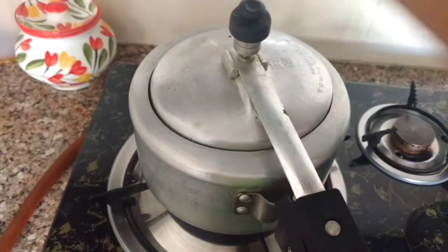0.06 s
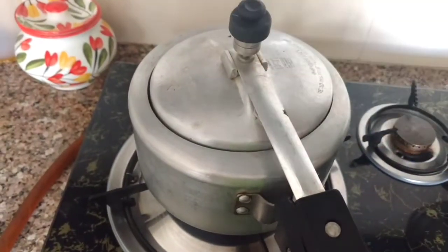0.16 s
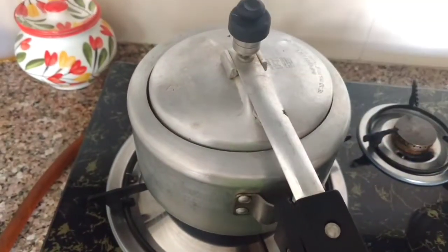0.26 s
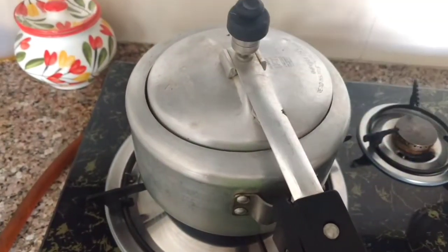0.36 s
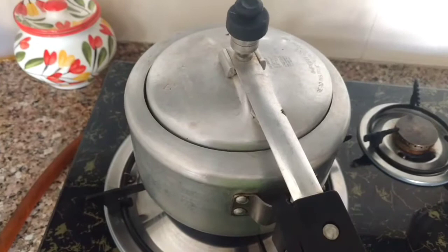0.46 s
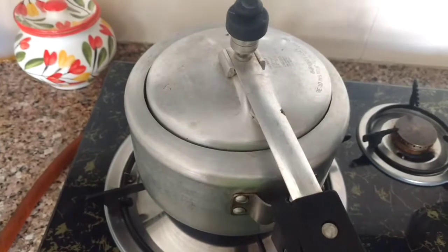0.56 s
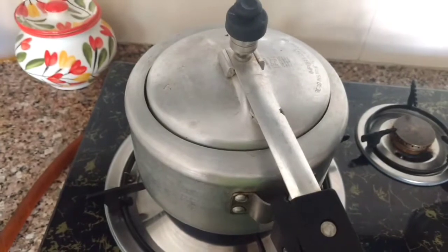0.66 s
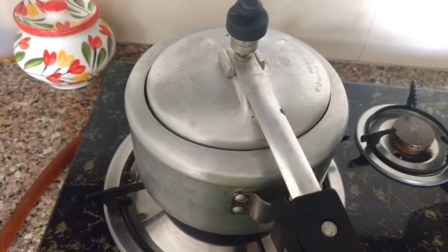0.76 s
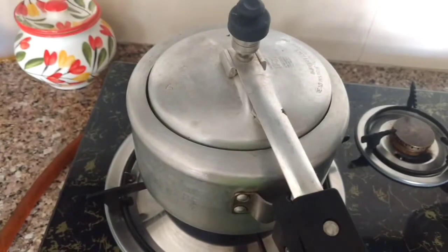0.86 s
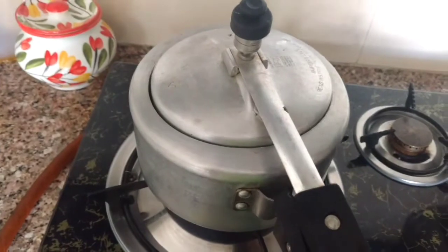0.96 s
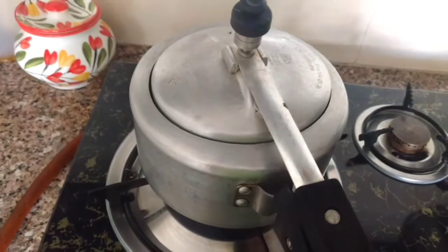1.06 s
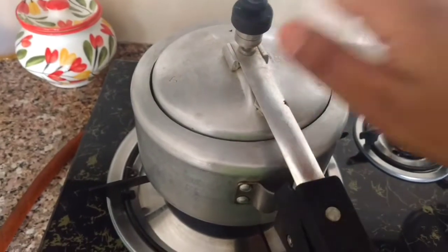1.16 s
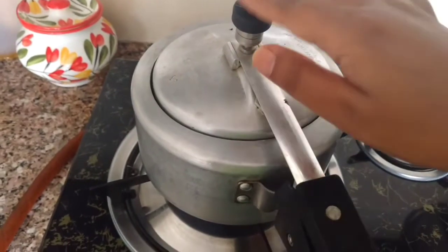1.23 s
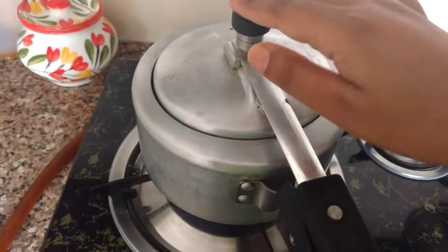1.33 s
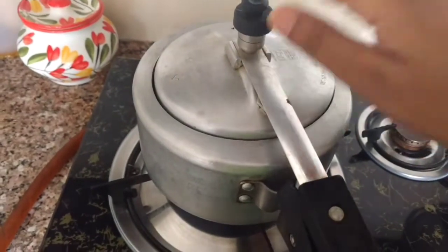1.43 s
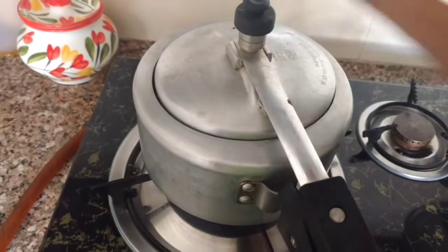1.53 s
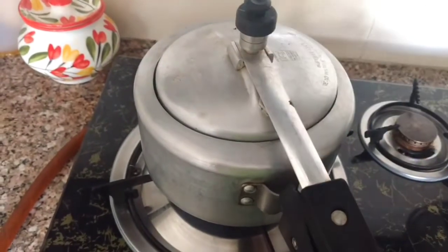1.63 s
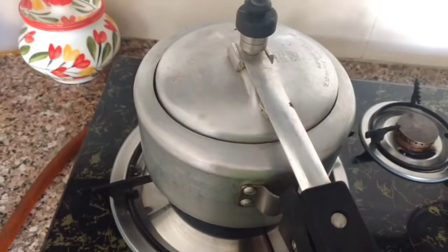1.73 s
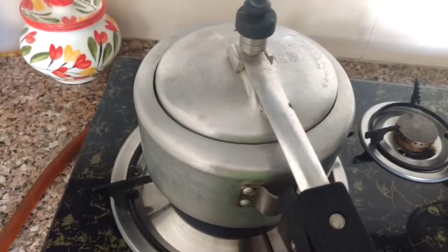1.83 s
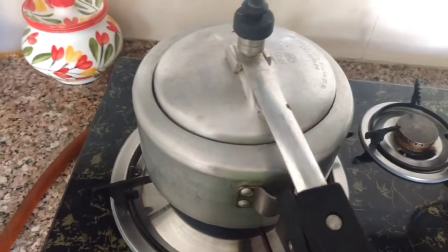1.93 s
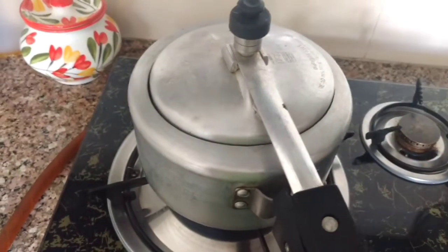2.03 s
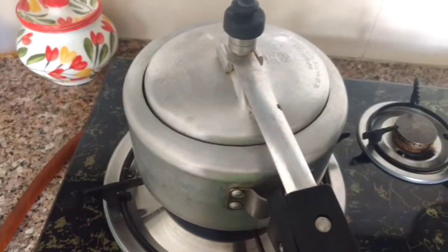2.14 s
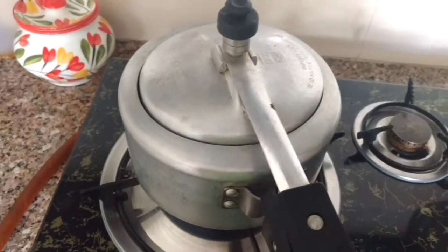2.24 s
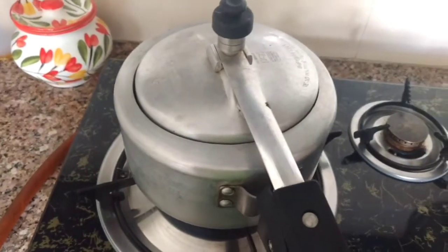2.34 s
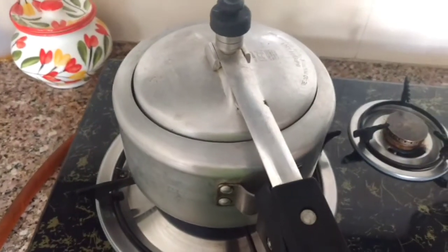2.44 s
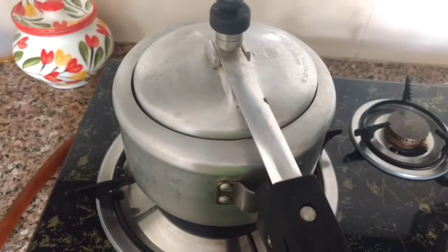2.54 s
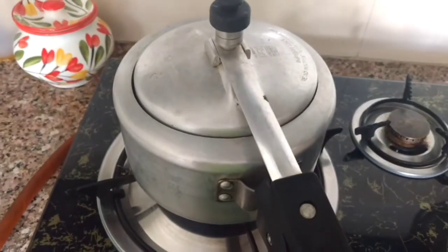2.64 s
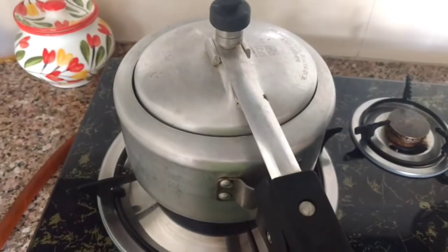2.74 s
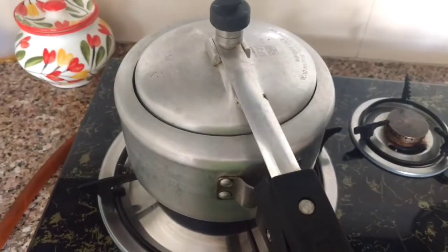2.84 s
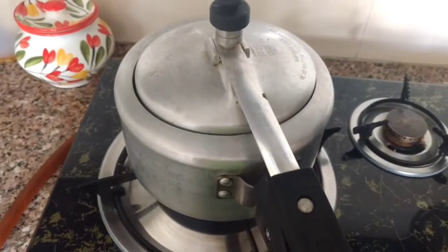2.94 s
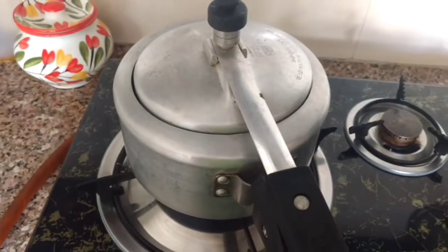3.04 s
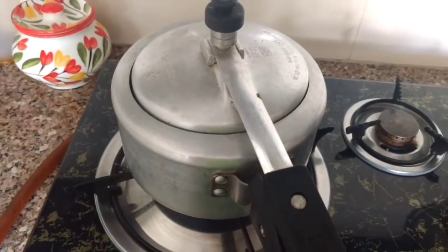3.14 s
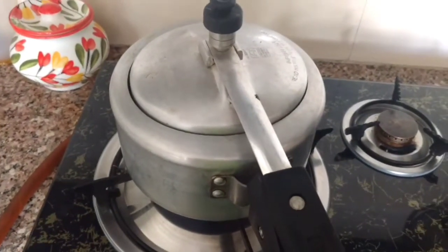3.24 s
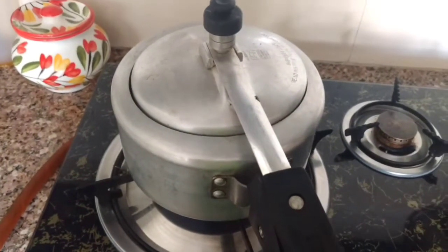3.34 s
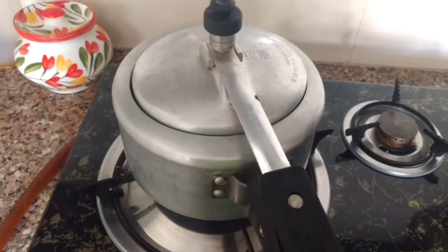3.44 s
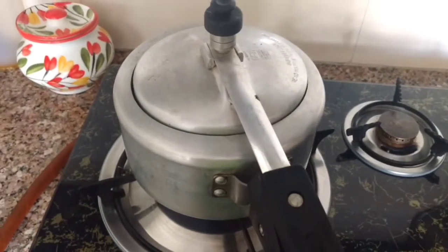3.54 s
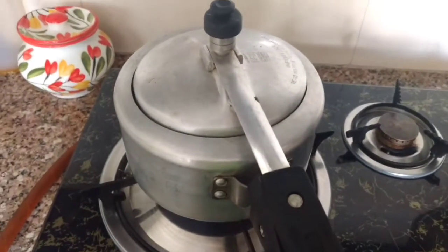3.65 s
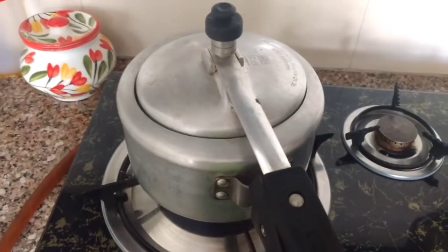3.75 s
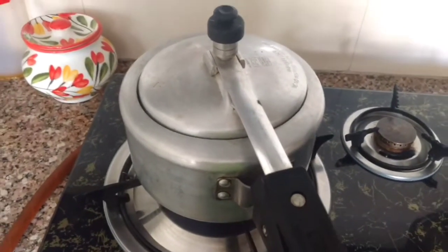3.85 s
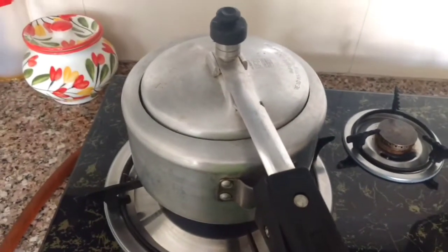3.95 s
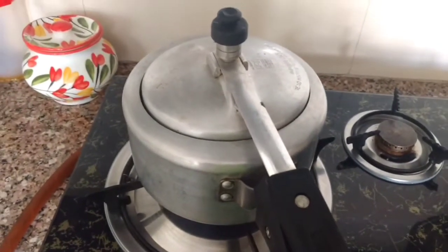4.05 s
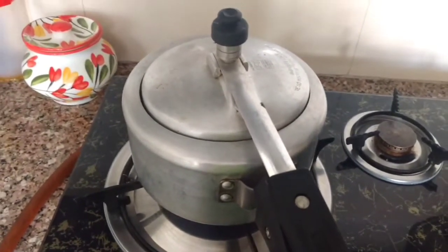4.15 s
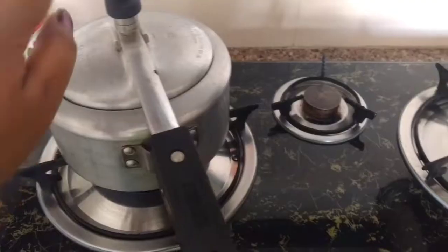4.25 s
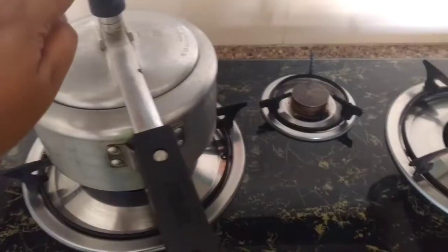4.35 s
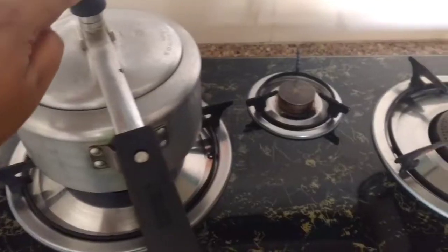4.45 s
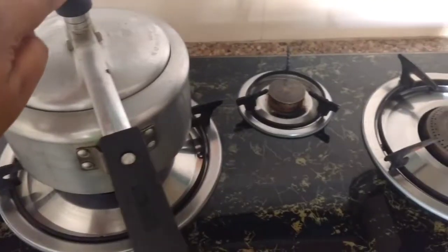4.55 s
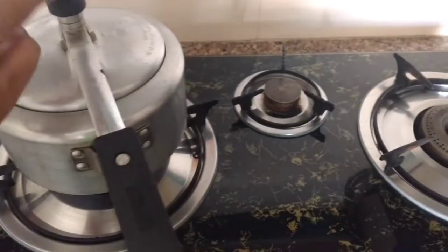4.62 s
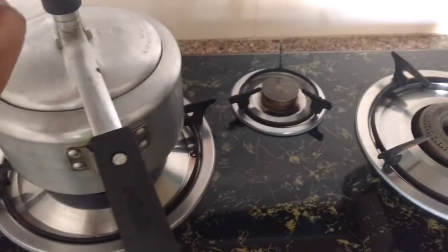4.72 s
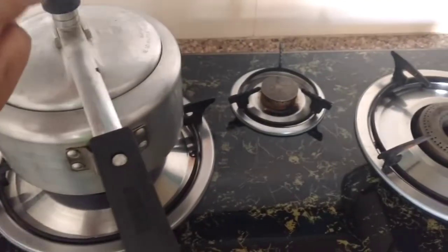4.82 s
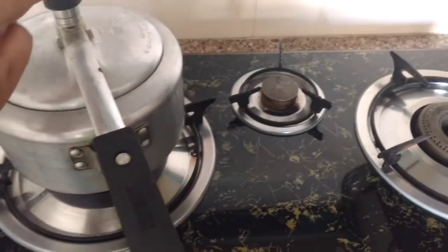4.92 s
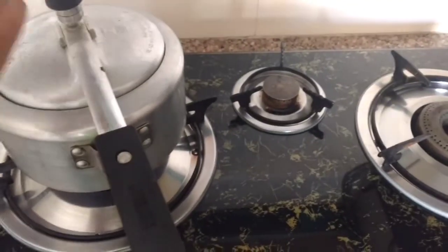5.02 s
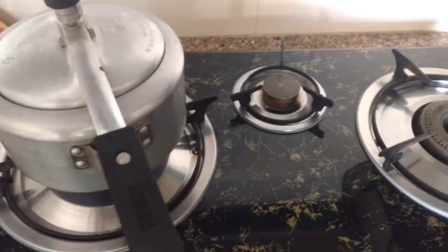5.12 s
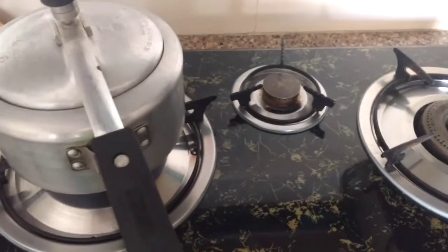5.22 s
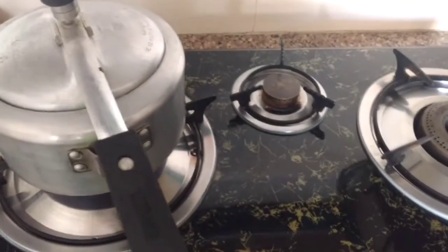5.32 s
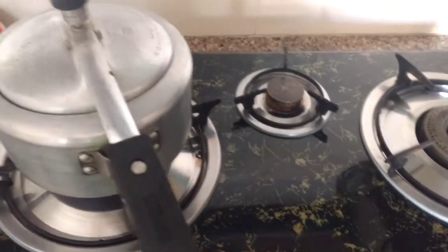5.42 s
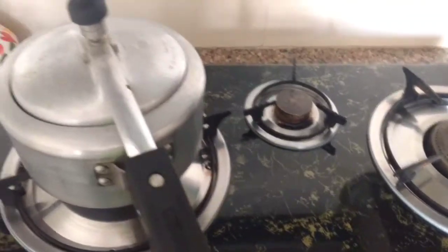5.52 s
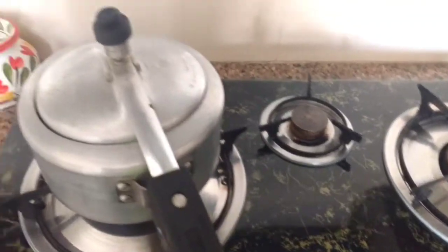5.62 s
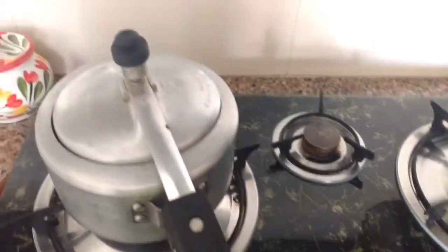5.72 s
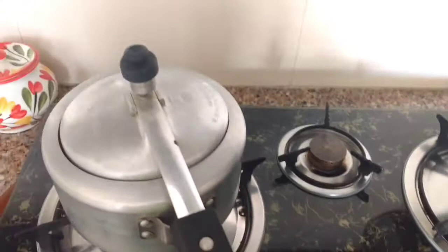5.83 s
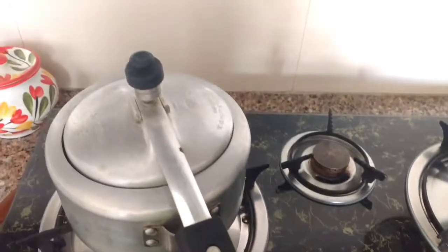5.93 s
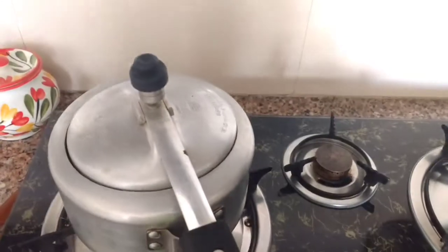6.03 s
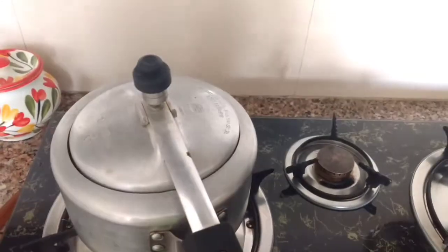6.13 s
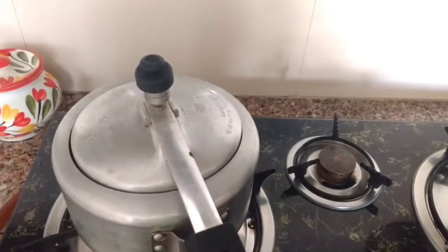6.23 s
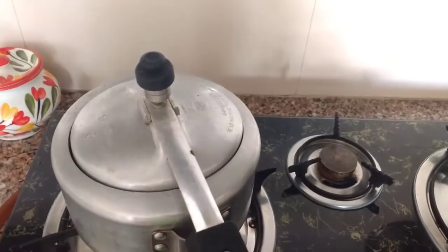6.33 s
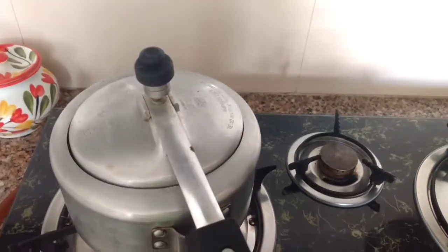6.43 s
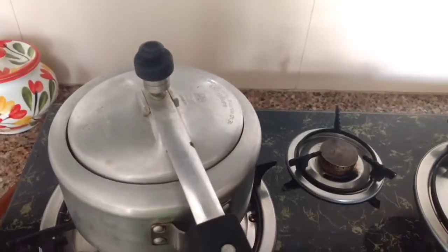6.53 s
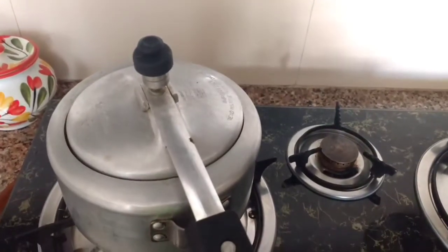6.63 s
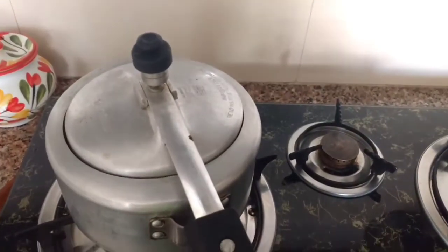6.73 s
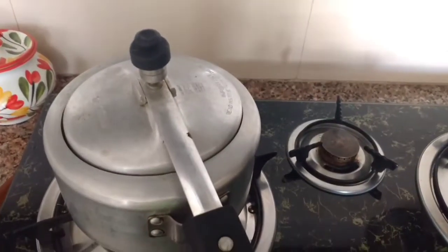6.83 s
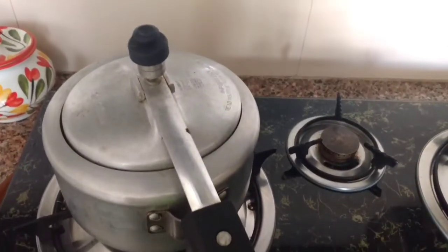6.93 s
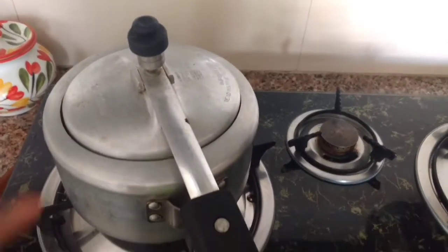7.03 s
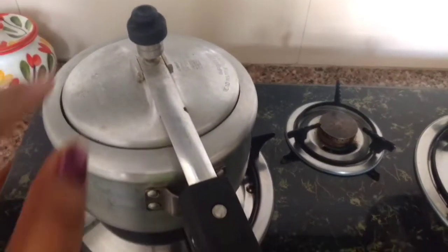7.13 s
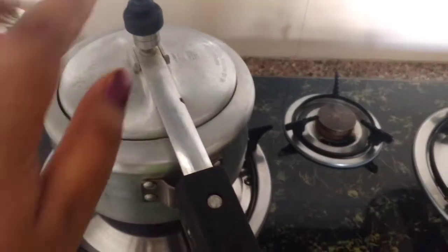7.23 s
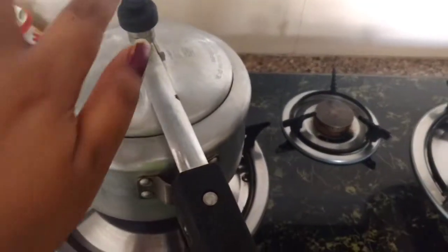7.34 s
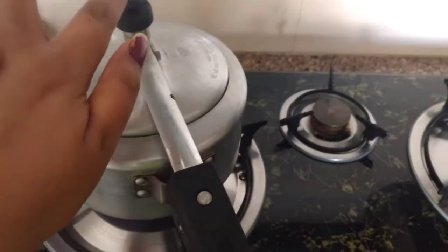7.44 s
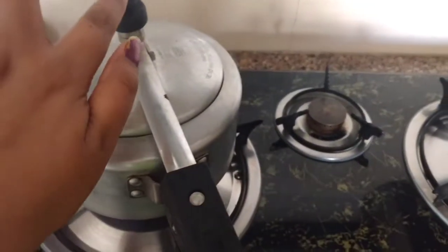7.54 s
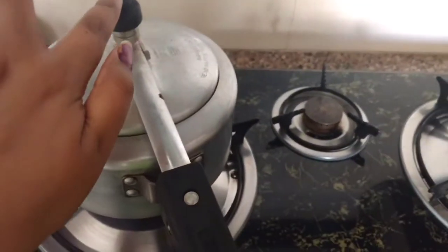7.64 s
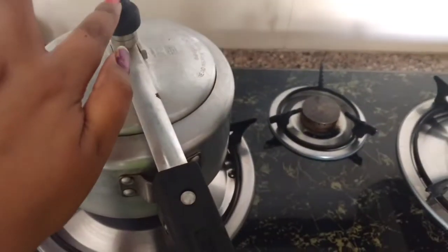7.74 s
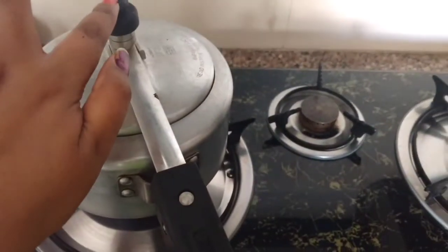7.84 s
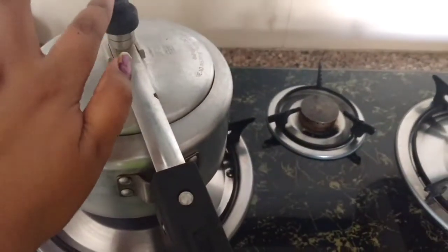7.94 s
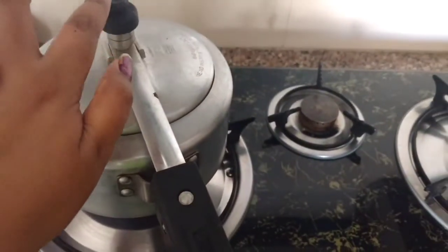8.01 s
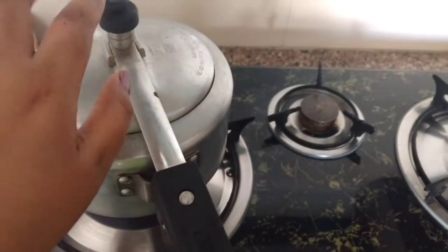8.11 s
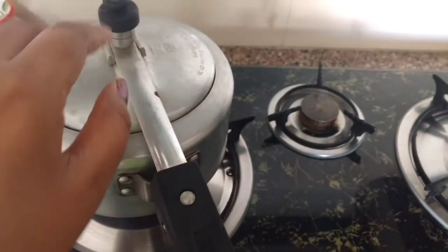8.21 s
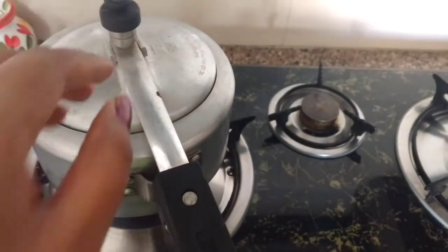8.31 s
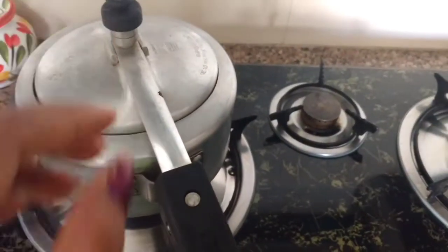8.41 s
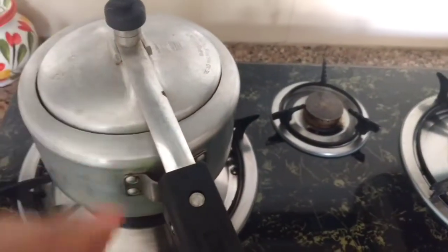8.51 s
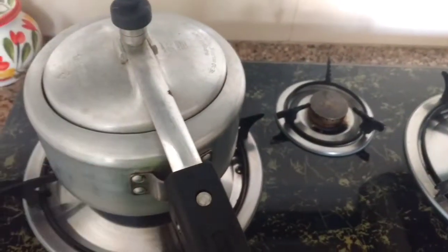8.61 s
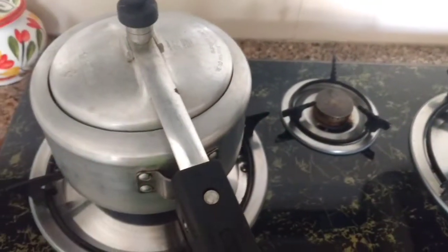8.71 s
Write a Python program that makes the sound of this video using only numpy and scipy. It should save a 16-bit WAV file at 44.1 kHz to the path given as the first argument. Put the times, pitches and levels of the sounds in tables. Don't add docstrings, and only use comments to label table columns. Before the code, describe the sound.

The sound opens at full force: a loud, wide, ragged hiss of steam, very bright and sizzling, from a pressure cooker close by in a small tiled kitchen. Soft finger thumps on the phone cluster in the first half second. At about 1.3 a hard metallic double clack shuts the valve and a short reverberant tail follows. From near silence, the burner's soft roar, a thin high leak whistle and a low far motor hum slowly creep up; faint distant horns sound near 1.9, 2.2 to 2.6 and 3.0. At 4.1 everything fades fast to silence. From 4.25 weaker steam spurts, with taps and hollow clinks around 4.5 to 4.6, and a knock at 4.88. A second blast, tighter and shriller, runs from 4.9 to 7.8, with a few faint bumps. A light metal tick ends it, leaving a very quiet kitchen that slowly rises again.

```python
import sys
import numpy as np
from scipy import signal
from scipy.fft import rfft, irfft, next_fast_len
from scipy.io import wavfile
from scipy.ndimage import uniform_filter1d, map_coordinates

SR = 44100
rng = np.random.default_rng(int(sys.argv[2]) if len(sys.argv) > 2 else 0)


def decibels_to_gain(level_db):
    exponent = np.asarray(level_db, float) / 20
    return 10 ** exponent


def unload_wav(signal):
    wavfile.write(
        sys.argv[1],
        SR,
        np.round(np.clip(np.atleast_2d(signal).T, -1, 1) * 32767).astype(np.int16),
    )


N = 386757

# start_s, steam_flow_db, gap_pinch (0 wide - 1 tight)
LIFTS = [
    [(0, -21.5, .2), (.1, -21.5, 0.15), (.7, -22, 0.075), (1.15, -21.5, 0), (1.335, -22.5, 0.16)],
    [(4.25, -29.5, .6), (4.5, -28, 0.42), (4.535, -38, .4), (4.585, -24, 0.39), (4.64, -29, 1),
     (4.69, -33.5, 0.56), (4.79, -33, 0.92), (4.83, -29, 0.56), (4.88, -33.5, 0.52)],
    [(4.897, -24.5, 1), (5.2, -21.5, 0.64), (5.7, -22, 0.46), (5.95, -22, 0.23), (6.25, -23, 0.2),
     (6.6, -22, 0.41), (7.15, -22.5, 0.33), (7.795, -23, .8), (7.83, -32.5, .5)],
]
FIRST_SHUT_S, NUDGED_SHUT_S, SECOND_SHUT_S = [lift[-1][0] for lift in LIFTS]
SECOND_OPEN_S = LIFTS[2][0][0]
SECOND_TAKE_S = 4.237


def unit(x):
    return x / np.sqrt(np.mean(x ** 2) + 1e-20)


def along(points, hz):
    f, v = np.transpose(points)
    return np.interp(np.log(hz + 1), np.log(f + 1), v)


def curves(rows):
    s, *cols = np.transpose(rows)
    return [np.interp(np.arange(N) / SR, s, c) for c in cols]


def wobble(knots_per_s):
    coarse = np.arange(0, N + 16, 16)
    knots = rng.standard_normal(int(N * knots_per_s / SR) + 4)
    return np.interp(np.arange(N), coarse, map_coordinates(knots, [coarse * knots_per_s / SR]))


def filtered(x, response):
    m = next_fast_len(N + SR // 2)
    return irfft(rfft(x, m) * response(np.fft.rfftfreq(m, 1 / SR)), m)[..., :N]


def high_pass(x, corner_hz):
    return filtered(x, lambda hz: (1j * hz / (corner_hz + 1j * hz)) ** 2)


def humps(modes, hz):
    return np.sqrt(sum(decibels_to_gain(2 * db) / (1 + (2 * (hz - c) / w) ** 2) ** 2 for c, w, db in modes))


def smooth_field(shape, bins, frames):
    field = uniform_filter1d(rng.standard_normal(shape), size=bins, axis=0)
    return unit(uniform_filter1d(field, size=frames, axis=1))


def turbulence(patchy_db, channels=1):
    z = signal.stft(rng.standard_normal((channels, N)), nperseg=512)[2]
    patches = decibels_to_gain(patchy_db * smooth_field(z.shape[1:], 3, 40))
    return signal.istft(z * patches, nperseg=512)[1][:, :N]


def jet():
    # hz, db_per_hz
    jet_colour = [(40, -25.5), (300, -29.5), (800, -21), (1300, -12.5), (2200, -8), (3000, -9.5),
                  (4000, -10.5), (5000, -6), (6500, -2.5), (8000, 3.5), (9500, 0.7), (11000, -8),
                  (13000, -15.5), (15000, -20.5)]
    # centre_hz, width_hz, level_db
    vent_modes = [(1474, 600, 2), (5030, 2500, -2), (7120, 470, -4.5), (8680, 790, -2.5)]
    # hz, share
    port_share = [(300, .02), (3000, 0.15), (6000, 0.28), (9000, 0.14), (14000, .3)]
    # centre_hz, extra_db, room_t60_s
    jet_bands = [(6870, 1.5, 0.34), (1580, 0.5, 0.5), (3670, 2, 0.47), (8350, -0.5, 0.12)]
    # level_db, db_per_flow_db, full_pinch_db, phone_turned_away_db
    band_answer = [(-3, 1.28, 2.8, -1.1), (-18.5, 0.06, -1, 0), (-6, 0.99, -4, -3), (-9, 1.14, 11, 0.95)]
    full_flow_db, shut_s, surge_db, wall_share = -21.5, 0.018, 1.06, 0.15

    both, own = turbulence(patchy_db=2.0, channels=2)
    own = filtered(own, lambda hz: np.clip(along(port_share, hz), 0, 1))
    pair = filtered(np.array([both + own, both - own]),
                    lambda hz: decibels_to_gain(along(jet_colour, hz)) * np.hypot(1, humps(vent_modes, hz)))
    flow_db, pinch = curves(sum(LIFTS, []))
    s = np.arange(N) / SR
    turned = s > SECOND_TAKE_S
    last_shut_s = np.where(turned, SECOND_SHUT_S, FIRST_SHUT_S)
    lifted = ((last_shut_s - s) / shut_s + 1).clip(0, 1)
    eddies = unit(decibels_to_gain(0.63 * wobble(350) + 0.33 * wobble(40)))

    steam = 0
    for (centre_hz, extra_db, t60_s), answer in zip(jet_bands, band_answer):
        db, follows, pinch_db, turned_db = answer
        share = [(c, c == centre_hz) for c, *_ in sorted(jet_bands)]
        share.append((12000, centre_hz == jet_bands[0][0]))
        band = filtered(pair, lambda hz: along(share, hz))
        band_db = full_flow_db + db + follows * (flow_db - full_flow_db)
        band_db = band_db + pinch_db * pinch + turned_db * turned
        direct_power = (lifted * eddies * decibels_to_gain(band_db + extra_db + surge_db * wobble(6))) ** 2
        keep = 10 ** (-6 / (t60_s * SR))
        wall_power = wall_share * signal.lfilter([1 - keep], [1, -keep], direct_power)
        steam = steam + np.sqrt(direct_power + wall_power) * unit(band)
    return steam


def handling():
    # start_s, peak_db
    thumps = [(.008, -31), (.025, -30), (.036, -21), (.052, -24), (.061, -28), (.07, -23), (.138, -29),
              (.188, -33), (.21, -32), (.272, -26), (.32, -31), (.341, -30), (.352, -26), (.367, -35),
              (.383, -30), (.447, -37), (5.201, -36), (5.371, -32), (6.798, -48), (7.749, -48)]
    push_ms, tick_s = 3.1, 0.00015
    tick_db, tick_db_per_db = -11, 0.5

    def push(u):
        return u * (1 - u / 3) * np.exp(-u)

    out, t = np.zeros(N + SR), np.arange(SR // 20) / SR
    varied_ms = push_ms * rng.uniform(0.75, 1.25, len(thumps))
    for (start_s, db), ms in zip(thumps, varied_ms):
        tick = decibels_to_gain(tick_db + tick_db_per_db * (db + 30)) * push(t / tick_s)
        shape = push(t / (ms / 2000)) - tick
        first = max(round((start_s - ms / 1000) * SR), 0)
        out[first:][:len(t)] += decibels_to_gain(db + 13) * shape
    return high_pass(out[:N], 65)


def weight():
    # start_s, peak_db, high_modes_db, hollow_mode_db
    knocks = [(1.3405, 0, 2, -22), (1.343, -1, 1, -16), (1.351, -6, -3, -10), (4.512, -24, -15, -15),
              (7.838, -16, -12, -20), (4.526, -17, -14, -6), (4.54, -36, -20, 15), (4.553, -35, -20, 15),
              (4.566, -37, -20, 15), (4.614, -9, -16, -24), (4.882, -9, -18, -5)]
    # mode_hz, level_db, t60_s, group (0 body, 1 high, 2 hollow)
    lid_modes = [(350, -8, .03, 2), (480, -6, .02, 2), (660, 0, .045, 2), (850, -12, .012, 0),
                 (1060, -11, .05, 0), (1250, -4, .01, 0), (1430, -2, .012, 0), (1750, -3, .01, 0),
                 (2300, -4, .009, 1), (2900, -4, .009, 1), (3600, -3, .009, 1), (3950, -1, .009, 1),
                 (4150, 1, .02, 1)]
    crack_t60_s, rise_s = 0.026, 0.0003

    out, t = np.zeros(N + SR), np.arange(SR // 4) / SR
    for start_s, db, high_db, hollow_db in knocks:
        ring = 0
        for hz, level_db, t60_s, group in lid_modes:
            mode_db = level_db + (0, high_db, hollow_db)[int(group)] + rng.normal(0, 2.2)
            ring = ring + decibels_to_gain(mode_db - 60 * t / t60_s) * np.sin(2 * np.pi * hz * t)
        crack = np.diff(uniform_filter1d(rng.standard_normal(len(t) + 1), size=9))
        crack = crack * decibels_to_gain(high_db + 7 - 60 * t / crack_t60_s)
        rise = 1 - np.exp(-t / rise_s)
        out[round(start_s * SR):][:len(t)] += decibels_to_gain(db - 8) * (ring + crack) * rise
    return high_pass(out[:N], 330)


def kitchen(x):
    # hz, t60_s
    wall_decay = [(200, 0.16), (1000, 0.49), (4000, 0.28), (10000, 0.24), (15000, 0.067)]
    hz, t, z = signal.stft(rng.standard_normal(SR // 2), SR, nperseg=256)
    tail = signal.istft(z * decibels_to_gain(-60 * t / along(wall_decay, hz)[:, None]), SR, nperseg=256)[1]
    return signal.fftconvolve(np.pad(x, (200, 0)), tail / np.linalg.norm(tail))[:N]


def gas_flame(both, own):
    # hz, db_per_hz
    flame_colour = [(40, -18.5), (110, 3), (220, -9), (320, 1), (600, -7.5), (1200, -2.5), (1800, -4.5),
                    (2600, -8.5), (4500, -17.5), (6500, -13), (9000, -10.5), (11500, -25), (13000, -20.5),
                    (14500, -26.5)]
    pair = np.array([both + 0.07 * own, both - 0.1 * own])
    return unit(filtered(pair, lambda hz: decibels_to_gain(along(flame_colour, hz))))


def seat_leak(apart):
    # centre_hz, width_hz, level_db
    seat_modes = [(7780, 190, 0), (7950, 260, -6), (7250, 260, -11), (7700, 1600, -15)]
    reseated_db, grows_db_per_s = -0.5, 0.5
    seat = turbulence(patchy_db=4.0)[0]
    pair = np.array([seat + 0.18 * apart, seat - 0.13 * apart])
    leak = unit(filtered(pair, lambda hz: humps(seat_modes, hz)))
    s = np.arange(N) / SR
    since_s = s - np.where(s > SECOND_TAKE_S, SECOND_SHUT_S, FIRST_SHUT_S)
    return leak * decibels_to_gain(reseated_db + grows_db_per_s * since_s.clip(0))


def motor():
    # line_hz, level_db
    hum_lines = [(73.5, -4.5), (146.5, -10), (331, -12), (488, -13), (653, -14.5), (1290, -16.5)]
    hum = 0
    for hz, db in hum_lines:
        level = decibels_to_gain(db + 2 * wobble(7))
        phase = 2 * np.pi * np.cumsum(hz * (1 + 0.012 * wobble(11))) / SR
        hum = hum + level * np.sin(phase)
    return hum


def horns():
    # start_s, end_s, first_hz, last_hz, level_over_kitchen_db, overtone_db
    horn_calls = [
        (1.847, 2.05, 344, 348, -9, -12),
        (2.199, 2.654, 321, 332.5, -6.5, -10),
        (2.941, 3.244, 719, 637, -14, -25),
    ]
    out, waver_hz = np.zeros(N), 10 * wobble(30)
    for start_s, end_s, first_hz, last_hz, db, over_db in horn_calls:
        u = np.linspace(0, 1, round((end_s - start_s) * SR))
        pitch_hz = first_hz + (last_hz - first_hz) * u ** 2 + waver_hz[:len(u)]
        phase = 2 * np.pi * np.cumsum(pitch_hz) / SR
        tone = np.sin(phase) + decibels_to_gain(over_db) * u * (np.sin(2 * phase) + 2 * np.sin(3 * phase))
        swell = np.sqrt(np.sin(np.pi * u).clip(0))
        out[round(start_s * SR):][:len(u)] += decibels_to_gain(db) * swell * tone
    return out * decibels_to_gain(4 * wobble(16))


def gain_db():
    held_db, settle_s, recover_db_per_s, ceiling_db = -57, 0.29, 10, -34.5
    reopen_db, sag_db = -38, 8.5
    s = np.arange(N) / SR

    def climb(shut_s):
        return np.clip(held_db + recover_db_per_s * (s - shut_s - settle_s), held_db, ceiling_db)

    nudged = np.interp(s, [SECOND_TAKE_S, NUDGED_SHUT_S, SECOND_OPEN_S + 0.05],
                       [reopen_db, reopen_db - sag_db, held_db])
    second = np.maximum(nudged, climb(SECOND_SHUT_S + 0.25)) - 1.8 * (s > SECOND_OPEN_S)
    return np.where(s < SECOND_TAKE_S, climb(FIRST_SHUT_S), second)


def quiet_kitchen():
    both, own = turbulence(patchy_db=1.1, channels=2)
    flame = gas_flame(both, own)
    leak = decibels_to_gain(1.5 + 1.3 * wobble(1.1)) * seat_leak(own[::-1])
    return decibels_to_gain(gain_db()) * (flame + leak + decibels_to_gain(-3.0) * motor() + horns())


def scene():
    knocks = weight()
    return jet() + knocks + decibels_to_gain(-12.5) * kitchen(knocks) + quiet_kitchen() + handling()


def band_thinning(left, right):
    # hz, drift_rms_rad
    side_drift = [(100, 0.25), (500, 1.08), (4300, 1.2), (5500, 0.55), (8000, .5), (9500, 1.1), (12000, 1)]
    # hz, margin_db
    under_near = [
        [(300, 30), (1500, 19.5), (2480, 12), (4970, 10), (7600, 25), (10050, 8.5), (12400, 11), (14500, 10)],
        [(300, 33), (1220, 12), (3720, 7.5), (6250, 17), (8920, 9.5), (11300, 7), (13800, 15), (15000, 12)],
    ]
    # hz, margin_db
    under_top = [(150, 42), (260, 48), (11000, 50), (14500, 31), (15300, 25)]
    near_unsure_db, top_unsure_db, top_hz = 1.5, 8, 15480
    starved_hz, starved_width_hz, starved_start_db, easing_db_per_s = 2750, 900, 11, 2

    hz, t, z = signal.stft(np.array([left + right, left - right]) / 2, SR, nperseg=1024)
    z[1] *= np.exp(1j * along(side_drift, hz)[:, None] * smooth_field(z.shape[1:], 5, 6))
    bands, blocks = np.arange(0, len(hz), 4), np.arange(0, len(t), 4)
    power = np.add.reduceat(abs(z) ** 2, bands, axis=1)
    power = np.add.reduceat(power, blocks, axis=2) + 1e-30
    band_hz, block_s = hz[bands] + 65, t[blocks]

    in_second = (block_s > SECOND_TAKE_S) & (block_s < SECOND_SHUT_S)
    easing_db = (starved_start_db - easing_db_per_s * (block_s - SECOND_TAKE_S)) * in_second
    starved_db = np.outer(abs(band_hz - starved_hz) < starved_width_hz / 2, easing_db)
    middle_db, side_db = [along(points, band_hz)[:, None] for points in under_near]
    margin_db = np.array([middle_db - starved_db, side_db - 0 * starved_db])

    doubt = rng.standard_normal((2,) + power.shape)
    near = uniform_filter1d(power.sum(axis=0), size=13, axis=0)
    near = near * decibels_to_gain(2 * (near_unsure_db * doubt[0] - margin_db))
    top_margin_db = along(under_top, band_hz)[:, None]
    top = power.max(axis=(0, 1)) * decibels_to_gain(2 * (top_unsure_db * doubt[1] - top_margin_db))
    kept = (power > np.maximum(near, top)).repeat(4, axis=1).repeat(4, axis=2)
    z *= kept[:, :len(hz), :len(t)]
    mid, side = signal.istft(z * (hz < top_hz)[:, None], SR, nperseg=1024)[1][:, :N]
    return np.array([mid + side, mid - side])


def join():
    fade_out_s, fall_s, fall_bend, rise_s = 4.1, 0.074, 2.8, 0.037
    s = np.arange(N) / SR
    fall = (1 - (s - fade_out_s) / fall_s).clip(0, 1) ** fall_bend
    rise = ((s - SECOND_TAKE_S) / rise_s).clip(0, 1)
    return np.where(s < SECOND_TAKE_S, fall, rise)


def roll_off(x):
    return signal.sosfilt(signal.butter(12, 15570, fs=SR, output="sos"), x)


def record(dry):
    # hz, level_db
    left_shade = [(4500, 1.5), (6000, -3.5), (8000, -2.5), (9500, -4.5), (12000, -3)]
    # hz, half_cycles
    port_phase = [(130, .07), (330, .29), (1220, .02), (6250, -.02), (8920, -.16), (11000, .04),
                  (14000, -.02), (16200, -1.3)]
    lag_s = 1 / 2490

    def lag(hz):
        half_cycles = 2 * lag_s * hz + np.interp(hz, *np.transpose(port_phase))
        return np.exp(-1j * np.pi * half_cycles)

    left = filtered(dry[0], lambda hz: lag(hz) * decibels_to_gain(along(left_shade, hz) / 2))
    right = filtered(-dry[1], lambda hz: decibels_to_gain(-along(left_shade, hz) / 2))
    mix = band_thinning(left, right) * join()
    return roll_off(mix)


dry = scene()
out = record(dry)
unload_wav(out)
```